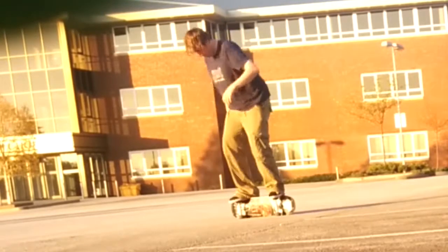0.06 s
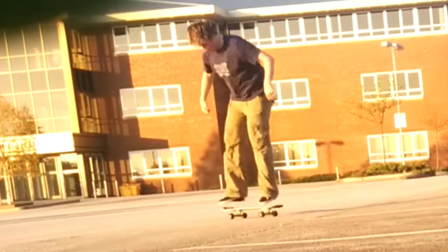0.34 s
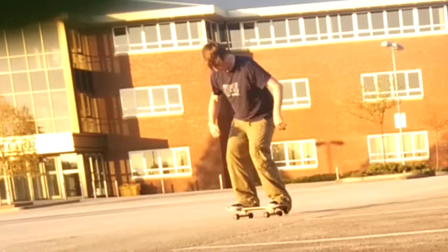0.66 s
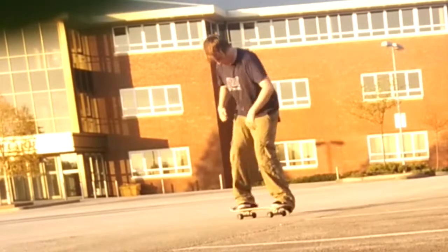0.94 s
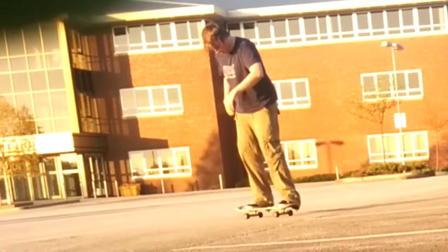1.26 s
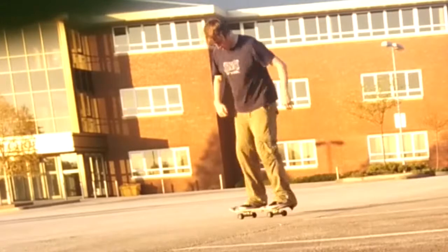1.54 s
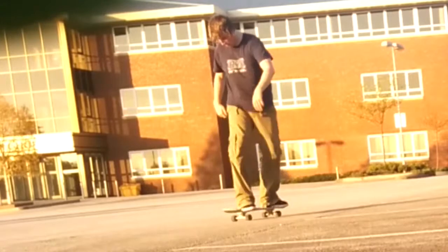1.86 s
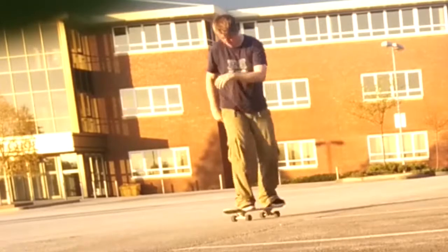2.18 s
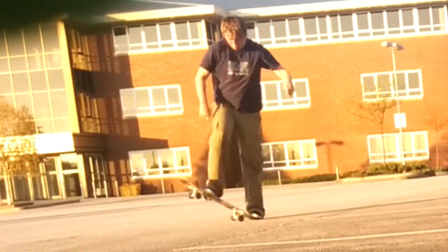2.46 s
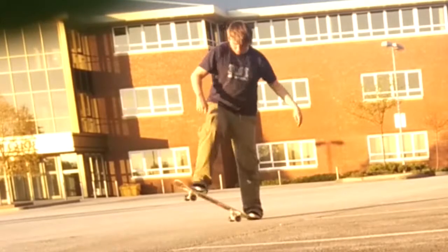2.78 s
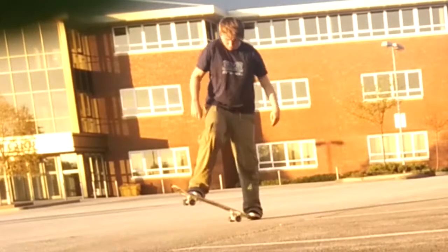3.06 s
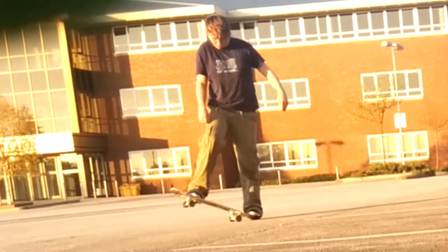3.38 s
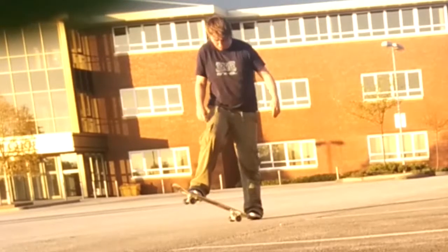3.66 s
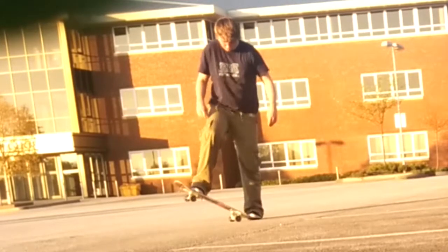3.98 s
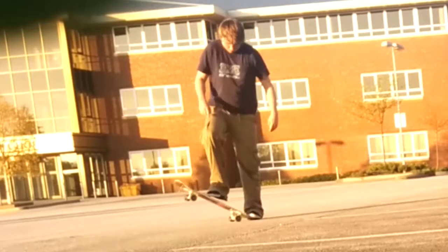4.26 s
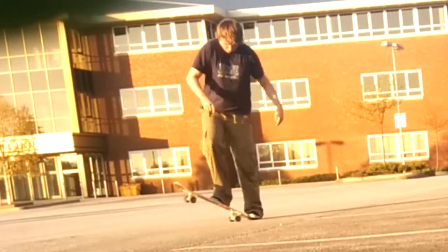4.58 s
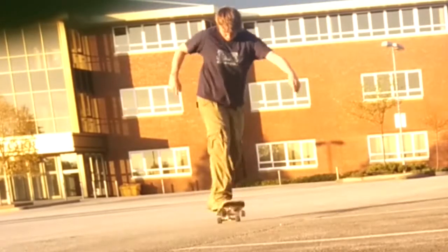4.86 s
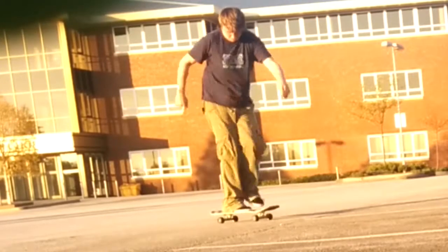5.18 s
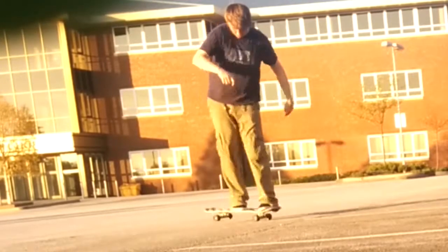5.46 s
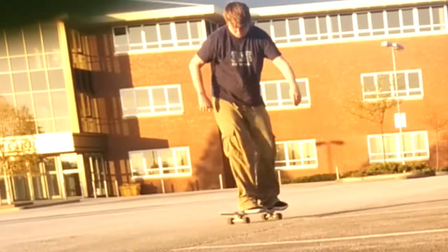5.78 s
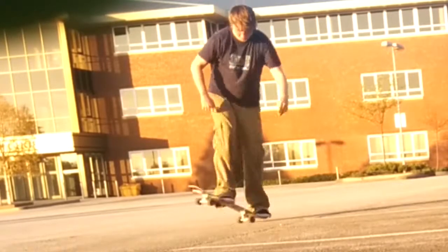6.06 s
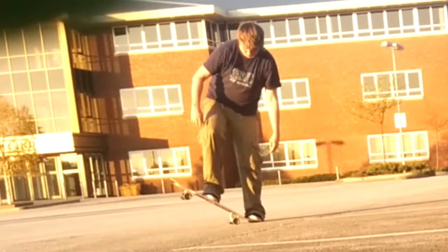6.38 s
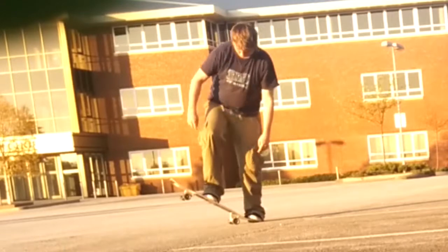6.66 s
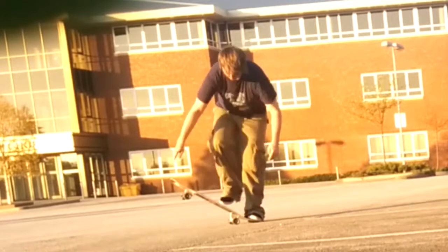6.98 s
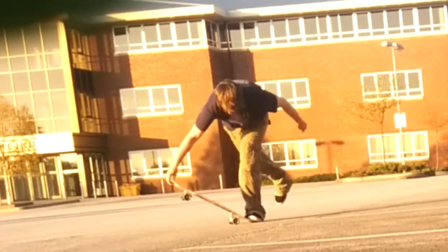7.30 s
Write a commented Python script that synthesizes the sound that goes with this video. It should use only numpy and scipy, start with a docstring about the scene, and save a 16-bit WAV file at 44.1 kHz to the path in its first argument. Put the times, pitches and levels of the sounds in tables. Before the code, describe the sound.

A skateboard is heard in front of the microphone in an open car park, with a faint echo from a building. Distant traffic and a low, slowly pulsing machinery hum continue throughout, with slight hiss. A foot knocks on the deck at the start. A light scuff leads into a sharp clack at 0.5 seconds and a quick clatter of wood and metal trucks. Soft scuffs and a tap come around 1.5 seconds, then lighter clacks near 2. A gritty scrape from 2.3 seconds surrounds a hard wooden knock at 2.6. Only the background remains from about 2.9 until a small click at 4.9. The loudest clack lands at 5.1 seconds. A scuff and double clack follow at 5.8, then another scrape with a hard knock and a crunch of grit around 6.25. A soft footfall at 6.6 and a slight swell of low rumble leave just the background.

```python
"""A skateboard doing flat-ground tricks in an open car park, heard from a camera's microphone.
In front, wheels and tail strike the asphalt: the maple deck rings, the trucks clack and grit cracks.
Shoes stamp and scuff on the deck, and the building opposite answers faintly.
Behind it all, distant traffic rushes and idling machinery drones, its close tones beating slowly."""
import sys
import numpy as np
from scipy import signal
from scipy.fft import rfft, irfft, next_fast_len
from scipy.io import wavfile
from scipy.ndimage import map_coordinates

SR = 44100
rng = np.random.default_rng(int(sys.argv[2]) if len(sys.argv) > 2 else 0)


def file_out(sig):
    """Save sig as 16-bit WAV at sys.argv[1]."""
    # one column per channel
    cols = np.atleast_2d(sig).T
    # limit, then scale
    lim = np.clip(cols, -1, 1)
    pcm = np.round(lim * 32767).astype(np.int16)
    wavfile.write(sys.argv[1], SR, pcm)


N = 332073


def amp(db):
    """Decibels to gain."""
    return 10 ** (np.asarray(db) / 20)


def unit_rms(x):
    """Scale to rms 1."""
    return x / np.sqrt(np.mean(x ** 2) + 1e-20)


def unit_onset(x):
    """Scale a hit to rms 1 over its first hundredth of a second."""
    return x / np.sqrt(np.mean(x[:SR // 100] ** 2) + 1e-20)


def at_hz(points, hz):
    """Read (frequency, value) points on a log frequency axis."""
    knots_hz, values = np.transpose(points)
    return np.interp(np.log(hz + 1), np.log(knots_hz + 1), values)


def curves(rows):
    """One value per sample for each column after the time."""
    times, *columns = np.transpose(rows)
    return [np.interp(np.arange(N) / SR, times, column) for column in columns]


def wobble(rate):
    """A smooth random curve, rate knots a second."""
    knots = rng.standard_normal(int(N * rate / SR) + 4)
    return map_coordinates(knots, [np.arange(N) * rate / SR])


def filtered(x, response):
    """Filter x by a gain given as a function of frequency."""
    size = next_fast_len(len(x) + SR // 10)
    return irfft(rfft(x, size) * response(np.fft.rfftfreq(size, 1 / SR)), size)[:len(x)]


def noise(spectrum, size=N):
    """Coloured noise of rms 1."""
    hz = np.fft.rfftfreq(size, 1 / SR)
    phases = np.exp(2j * np.pi * rng.random(len(hz)))
    return unit_rms(irfft(amp(at_hz(spectrum, hz)) * phases, size))


def burst(spectrum, t, t60, attack):
    """Impact noise that rises fast and dies away."""
    envelope = amp(-60 * t / t60) * (1 - np.exp(-t / attack))
    return unit_onset(noise(spectrum, size=len(t)) * envelope)


def add(track, start, sound):
    """Mix a sound into the track at start seconds."""
    part = track[max(round(start * SR), 0):][:len(sound)]
    part += sound[:len(part)]


# Low rumble and rush: (time [s], relative rumble level [dB], relative rush level [dB])
RUMBLE_AND_RUSH_LEVELS = [(0.0, -39.5, -40.5), (0.61, -36, -40.5), (1.03, -38.5, -41.5),
                          (5.95, -38.5, -40.5), (6.67, -33.5, -39), (7.0, -38.5, -40), (7.53, -39, -39.5)]
# Colours of the rumble and of distant tyres: (frequency [Hz], relative density [dB])
RUMBLE_SPECTRUM = [(15, -35), (30, -21), (45, 3.5), (68, 7.5), (85, 1), (120, 0), (170, -1.5), (280, -3),
                   (400, -9.5), (700, -24), (2000, -53)]
TYRE_SPECTRUM = [(150, -22), (330, -4), (480, 1.5), (700, 0.5), (950, 1), (1300, -7.5), (1800, -16.5),
                 (2500, -27), (4000, -35), (10000, -43.5)]


def rumble_and_rush(rumble_gain_db=4, rush_gain_db=1.0):
    """Steady traffic far from the microphone, with brief low swells as the board rolls or a foot shifts."""
    rumble_db, rush_db = curves(RUMBLE_AND_RUSH_LEVELS)
    rumble = amp(rumble_db + rumble_gain_db + 1.17 * wobble(9)) * noise(RUMBLE_SPECTRUM)
    rush = amp(rush_db + rush_gain_db + 0.26 * wobble(7.8)) * noise(TYRE_SPECTRUM)
    return rumble + rush


DRONE_HZ, OCTAVE_HZ = 52.5, 105.1
IN_STEP_S, FIRST_LULL_S = 2.43, 0.545  # the deep hums add up fully; the octave pair first dips
# Machines running at nearly one speed: (offset from the drone's pitch [Hz], level [dB])
MACHINE_HUMS = [(0, -27), (-0.26, -30), (0.18, -39)]
# Two close tones at the octave: (time [s], beat rate [Hz], stronger tone [dB], weaker's share [0-1])
OCTAVE_BEAT = [(0, 1.52, -37.5, 0.8), (1.0, 1.5, -35, 0.94), (2.6, 1.89, -39.5, 0.9),
               (3.3, 1.47, -31, 0.22), (4.35, 1.14, -37.5, 0.54), (5.3, 0.9, -35, 0.1),
               (7.53, 1.2, -40.5, 0.6)]


def machinery(third_db=-49, fourth_db=-49, waver_rad=0.29):
    """Machines idle in the background: deep hums beat slowly, their octave faster, overtones waver."""
    t = np.arange(N) / SR
    rad_per_hz = 2 * np.pi * (t - IN_STEP_S)
    hums = sum(amp(db) * np.sin((DRONE_HZ + offset) * rad_per_hz) for offset, db in MACHINE_HUMS)
    beat_hz, octave_db, share = curves(OCTAVE_BEAT)
    beats = np.cumsum(beat_hz) / SR
    slip = 2 * np.pi * (beats - np.interp(FIRST_LULL_S, t, beats))
    phase = OCTAVE_HZ * rad_per_hz + waver_rad * wobble(2.87)
    octave = amp(octave_db) * (np.sin(phase) - share * np.sin(phase - slip))
    third = amp(third_db) * np.sin((DRONE_HZ + OCTAVE_HZ) * rad_per_hz + wobble(5))
    fourth = amp(fourth_db) * np.sin(2 * OCTAVE_HZ * rad_per_hz + wobble(4))
    return np.sqrt(2) * (hums + octave + third + fourth)


# Decay of the open car park: (frequency [Hz], t60 [s])
CAR_PARK_DECAY = [(200, 0.22), (2000, 0.32), (8000, 0.19), (15000, 0.094)]
# Colour of the reflections at the microphone: (frequency [Hz], gain [dB])
REFLECTION_COLOUR = [(200, -15), (2000, -2), (4500, 1.5), (8000, 8), (14000, 2)]


def car_park_echo(direct, tail_db=-18, wall_db=-23, wall_delay_s=.037):
    """The building opposite returns one weak reflection, the open car park a thin tail."""
    hz, t, spectra = signal.stft(rng.standard_normal(SR // 2), SR, nperseg=256)
    decay = amp(-60 * t / at_hz(CAR_PARK_DECAY, hz)[:, None])
    tail = signal.istft(spectra * decay, SR, nperseg=256)[1]
    response = amp(tail_db) * tail / np.linalg.norm(tail)
    response[round(wall_delay_s * SR)] += amp(wall_db)
    reflections = signal.fftconvolve(direct, response)[:N]
    return filtered(reflections, lambda hz: amp(at_hz(REFLECTION_COLOUR, hz)))


# Loose sand crushed under the tail or a sole: (time [s], level [dB])
SAND_CRUNCHES = [(1.380, -56), (2.619, -47), (2.675, -51), (6.124, -57), (6.254, -52), (6.292, -53)]
# Its bright spray: (frequency [Hz], relative density [dB])
SAND_SPECTRUM = [(4000, -20), (8000, -2), (12000, 0), (15500, -4)]


def sand(t60=0.05, grain_db=4):
    """Down on the asphalt, sand grains crack in short, bright sprays."""
    out, t = np.zeros(N), np.arange(SR // 8) / SR
    for start, db in SAND_CRUNCHES:
        add(out, start, amp(db) * burst(SAND_SPECTRUM, t, t60, attack=.001))
    return out * unit_rms(amp(grain_db * wobble(1500)))


def rub_pressure(start, length, db, attack_s=.04, release_s=0.054, sag_db_per_s=4):
    """A rub presses on, eases as it slows, and lifts off."""
    t = np.clip(np.arange(N) / SR - start, 0, length)
    gate = np.clip(np.minimum(t / attack_s, (length - t) / release_s), 0, 1)
    return gate * amp(db - sag_db_per_s * t)


# Soles on grip tape and wheels skidding: (time [s], length [s], relative level [dB])
RUBS = [(0.33, .3, -57), (1.345, .11, -58), (1.627, 0.17, -57), (2.337, 0.42, -50.5), (5.748, .13, -48),
        (6.01, 0.35, -52)]
# Their rasp: (frequency [Hz], relative density [dB])
SCUFF_SPECTRUM = [(600, -21), (1800, 8), (2800, -1.5), (3900, 1), (5200, -3), (6700, -6), (7900, 1),
                  (9000, -7), (10500, -10), (15500, -18)]


def scuffs(gain_db=-1, grain_db=4, uneven_db=1.9):
    """Soles and wheels catch on countless small grains, so their rubbing crackles."""
    pressure = sum(rub_pressure(*rub) for rub in RUBS)
    flutter_db = uneven_db * wobble(60)
    catches = rng.standard_normal(N) * amp(grain_db * wobble(700) + flutter_db)
    rasp = unit_rms(filtered(catches, lambda hz: amp(at_hz(SCUFF_SPECTRUM, hz))))
    return amp(gain_db) * pressure * rasp


def ring(modes, t, damping, scatter_db):
    """Modes struck at new strengths and signs; a foot on the board damps them."""
    hz, db, t60 = np.transpose(modes)[:, :, None]
    strength = amp(db + scatter_db * rng.standard_normal(hz.shape)) * rng.choice([-1, 1], hz.shape)
    detuned_hz = hz * (1 + 0.0062 * rng.standard_normal(hz.shape))
    decay = amp(-60 * t / t60 * damping)
    return unit_onset(np.sum(strength * np.sin(2 * np.pi * detuned_hz * t) * decay, axis=0))


def favoured(points, spot_hz, lift_db=12, octaves=0.38):
    """The struck spot brings out the resonances near one pitch."""
    rows = np.array(points, float)
    rows[:, 1] += lift_db * np.exp(-.5 * (np.log2(rows[:, 0] / spot_hz) / octaves) ** 2)
    return rows


def tilted(points, db_per_octave, pivot_hz=2500):
    """Harder contacts are brighter: a slope about the middle of the trucks' range."""
    rows = np.array(points, float)
    rows[:, 1] += db_per_octave * np.log2(rows[:, 0] / pivot_hz)
    return rows


GRIT_DB, GRIT_DB_PER_TRUCK_DB = -11, 0.74  # a strike's grit relative to the deck; its rise with trucks
# Resonances of the board: (frequency [Hz], relative level [dB], t60 [s])
DECK_MODES = [(378.6, -1.5, 0.098), (449, -3, 0.061), (554, -0.5, 0.054), (695, -3.5, 0.031),
              (821, -6, 0.079), (929, 2, 0.035), (1069, -9, 0.11), (1217, -4.5, 0.05), (1425, -9.5, 0.058),
              (1593, -16.5, 0.098)]  # maple plywood
TRUCK_MODES = [(1606, 0, 0.04), (1900, 3.5, 0.061), (1995, 0, 0.061), (2220, -4.5, 0.091),
               (2346, 2.5, 0.041), (2636, -4, 0.058), (3560, -11, 0.033), (3960, -8, 0.046),
               (4010, -10, 0.049), (4720, -13, .06)]  # trucks and hard wheels
AXLE_MODES = [(4800, -22, .1), (6000, 8, .12), (7100, 1, .08), (7340, 10, 0.12), (7800, 0, .14),
              (8140, -2, 0.1), (8900, -8, .09)]  # steel axles and washers
# Impact noises of the board: (frequency [Hz], relative density [dB])
THUD_SPECTRUM = [(70, -36), (150, -15.5), (260, -3), (330, -14), (550, -41), (1200, -59)]
KNOCK_SPECTRUM = [(150, -34), (330, 15), (550, 3.5), (720, 2.5), (950, -1), (1400, -10), (2000, -24),
                  (5000, -72)]
CLACK_SPECTRUM = [(700, -36), (1400, 5.5), (1750, 0), (2050, 2), (2500, -11.5), (3100, -6), (4000, -3),
                  (4900, -11.5), (6500, -35), (12000, -60)]
GRIT_SPECTRUM = [(2500, -29), (5000, 2), (6100, -2.5), (7700, -0.5), (9000, -3.5), (10500, -8.5),
                 (15500, -22)]


def contact(deck_db, thud_db, truck_db, grit_db, t60, spot_hz, axle_db=-10, crack_db=-6):
    """One blow thuds, rings deck, trucks and axles, and crushes grit with a first sharp crack."""
    t = np.arange(SR // 4) / SR
    damping = np.sqrt(0.088 / t60)
    tilt = 0.5 * min(grit_db - truck_db - GRIT_DB, 0)  # a blow that raises little grit is a soft one
    thud = burst(THUD_SPECTRUM, t, 1.16 * t60, attack=0.00044)
    knock = burst(favoured(KNOCK_SPECTRUM, spot_hz), t, 1.6 * t60, attack=0.0005)
    deck_ring = ring(favoured(DECK_MODES, spot_hz), t, damping, scatter_db=-0.5)
    deck = unit_onset(deck_ring + 0.46 * knock)
    clack = burst(tilted(CLACK_SPECTRUM, tilt), t, t60, attack=0.00051)
    truck_ring = ring(tilted(TRUCK_MODES, tilt), t, damping, scatter_db=1.0)
    truck = unit_onset(0.67 * truck_ring + clack)
    crush = burst(GRIT_SPECTRUM, t, 1.44 * t60, attack=0.00034)
    crack = burst(GRIT_SPECTRUM, t, t60=0.0099, attack=.0001)
    axle_ring = ring(AXLE_MODES, t, damping, scatter_db=2)
    grit = unit_onset(crush + amp(crack_db) * crack + amp(axle_db) * axle_ring)
    return amp(deck_db) * (deck + amp(thud_db) * thud + amp(truck_db) * truck + amp(grit_db) * grit)


# Feet shift and stamp on the deck: (time [s], deck level [dB], thud over deck [dB],
# trucks over deck [dB], clack t60 [s], favoured deck pitch [Hz])
FOOTFALLS = [ (0.003, -27, -7, -21, 0.081, 342), (0.362, -37.5, 3.5, -3, .11, 900),
             (0.381, -37.5, 1, -3, 0.17, 1000), (0.71, -38, -7, -7, 0.049, 700),
             (1.536, -35, -16, -7.5, 0.035, 1450), (2.572, -42, 14.5, -3, 0.1, 400),
             (2.593, -32.5, 4, -12, .11, 400), (5.092, -43, -3, -5, .05, 900),
             (5.401, -46, 6, -2, 0.078, 900), (5.42, -48.5, -8, 2.5, .07, 900),
             (6.082, -47, 9, 5.5, .08, 900), (6.177, -39, 7.5, -9, .075, 885),
             (6.266, -30.5, -12, -9, 0.14, 646), (6.606, -45, 9, -22, 0.12, 350)]


def feet(sole_grit_db=-21):
    """Each step is one soft contact that rattles the trucks and raises little grit."""
    out = np.zeros(N)
    for start, deck_db, thud_db, truck_db, t60, spot_hz in FOOTFALLS:
        grit_db = sole_grit_db + GRIT_DB_PER_TRUCK_DB * truck_db
        add(out, start, contact(deck_db, thud_db, truck_db, grit_db, t60, spot_hz))
    return out


# Wheels or tail strike the asphalt: (time [s], deck level [dB], thud over deck [dB], trucks over
# deck [dB], clack t60 [s], favoured deck pitch [Hz], second contact over first [dB])
ASPHALT_STRIKES = [ (0.483, -18, -6.5, -3.5, 0.045, 1400, -8), (0.514, -30, -16, -3, 0.11, 1500, -12),
                   (0.550, -31, -4, -4, 0.068, 900, -6), (0.5726, -24.5, -6, -12, 0.074, 600, -15),
                   (0.6171, -21, -7, -23.5, 0.02, 696, -32), (1.9959, -34.5, -10, -10, 0.12, 900, -14),
                   (2.0281, -30, -5.5, -5, 0.061, 1110, -22), (2.189, -34, 0, -5, 0.021, 1450, -24),
                   (2.6161, -20.5, -21, -17.5, 0.074, 620, -23), (2.671, -30, 3, -9, 0.045, 800, -6.5),
                   (2.737, -40, 2, -2.5, 0.035, 1300, 2), (4.902, -32.5, -12, -6.5, 0.013, 950, -15),
                   (5.125, -15.5, -11, -6.5, 0.033, 627, -6), (5.7864, -29, 0, 0.5, 0.047, 740, 0),
                   (5.813, -29, 0.5, -3.5, 0.071, 900, -5.5), (6.2463, -21, -23, -16, .03, 710, -10),
                   (6.291, -35.5, -1, -6, .069, 800, -15)]


def skateboard(lag_s=.0086, mid_deck_hz=965):
    """In front, the board lands in two quick contacts; harder hits on the trucks crush more grit."""
    out = np.zeros(N)
    for start, deck_db, thud_db, truck_db, t60, spot_hz, second_db in ASPHALT_STRIKES:
        grit_db = GRIT_DB + GRIT_DB_PER_TRUCK_DB * truck_db
        add(out, start, contact(deck_db, thud_db, truck_db, grit_db, t60, spot_hz))
        # the other wheels touch down and ring the middle of the deck
        second = contact(deck_db + second_db, thud_db, truck_db, grit_db, t60, mid_deck_hz)
        add(out, start + lag_s, second)
    return out


def scene():
    """From one spot in the car park, in mono: the skater and the echo, over machinery and far traffic."""
    skater = skateboard() + feet() + scuffs() + sand()
    return (skater + car_park_echo(skater) + machinery() + rumble_and_rush())[None]


# Self-noise of the camera: (frequency [Hz], relative density [dB])
HISS_SPECTRUM = [(100, -3), (3000, 0.5), (8000, -1), (15500, -3)]


def record(dry, hiss_db=-56, top_hz=15830):
    """The camera adds its own hiss and keeps nothing above its band limit."""
    return filtered(dry[0] + amp(hiss_db) * noise(HISS_SPECTRUM), lambda hz: hz < top_hz)[None]


dry = scene()
out = record(dry)
file_out(out)
```